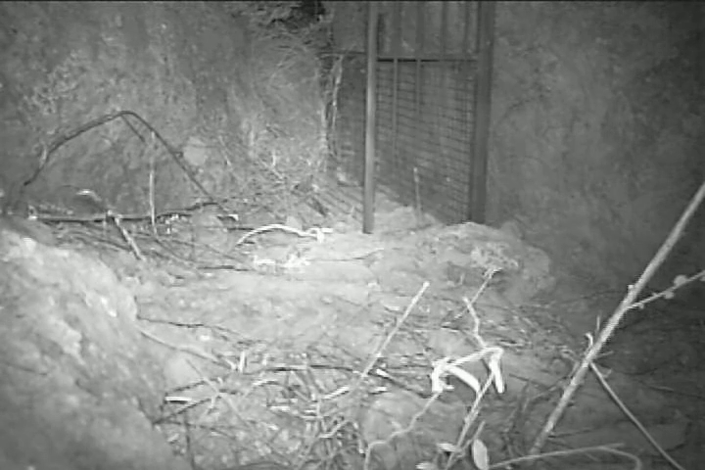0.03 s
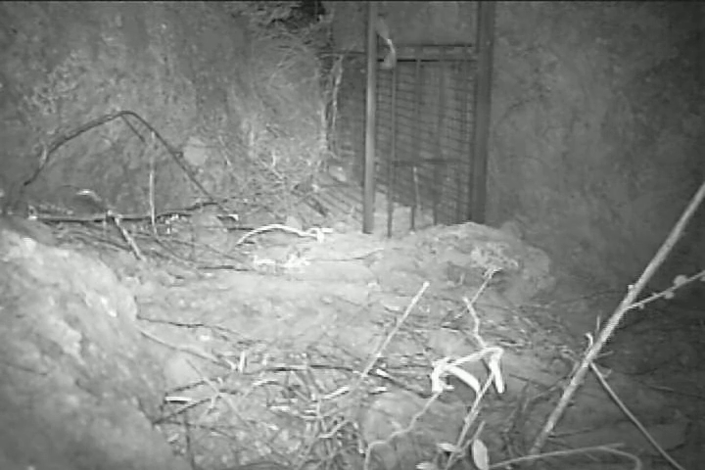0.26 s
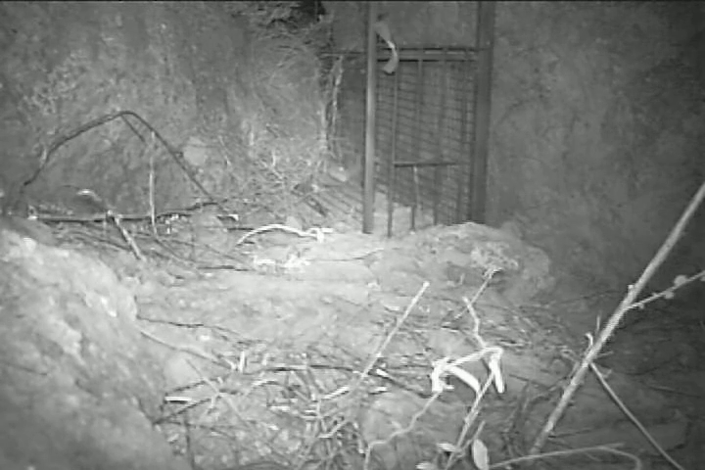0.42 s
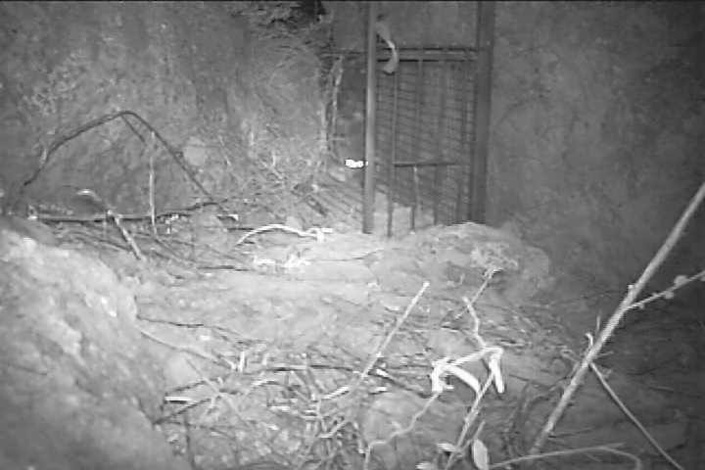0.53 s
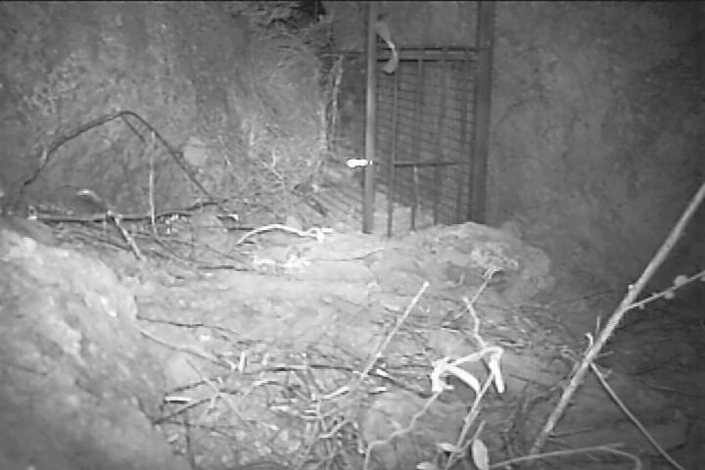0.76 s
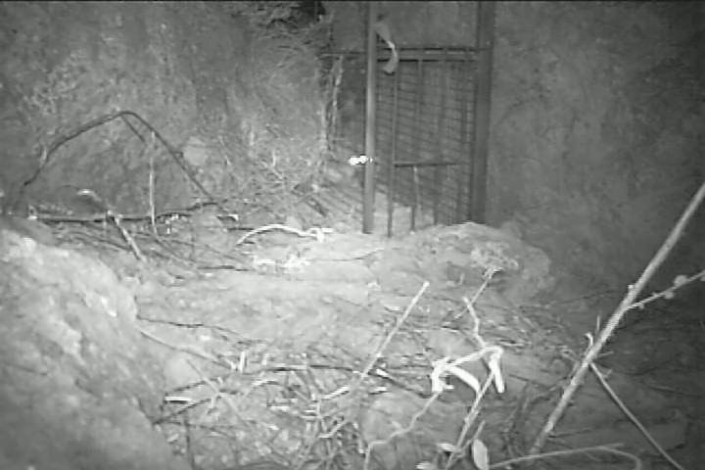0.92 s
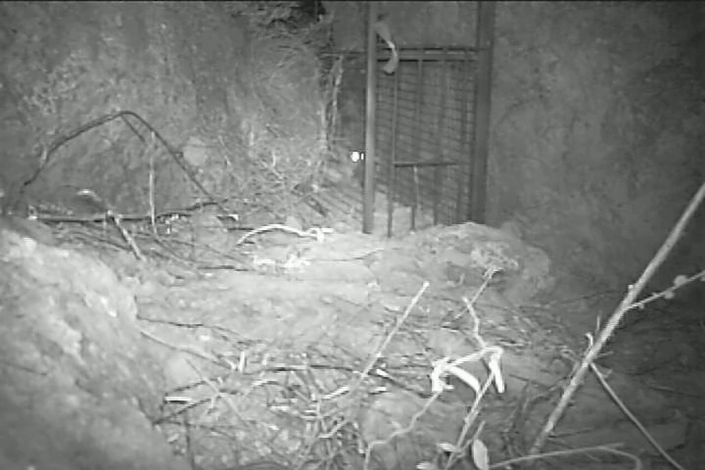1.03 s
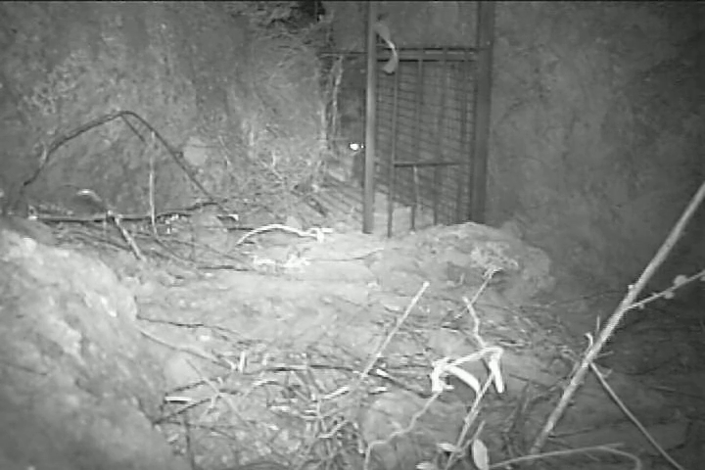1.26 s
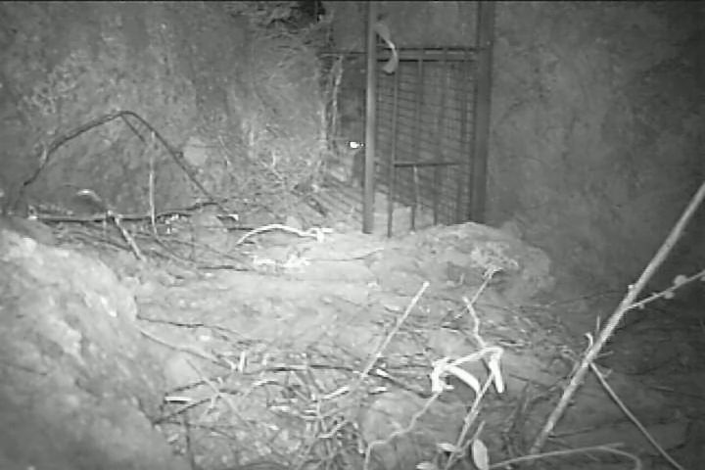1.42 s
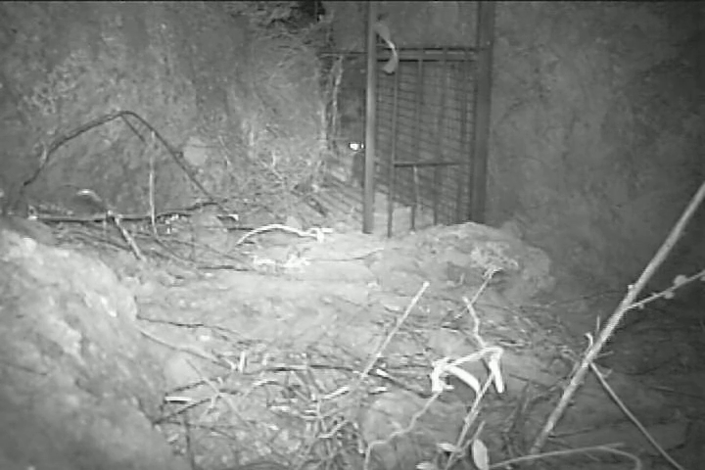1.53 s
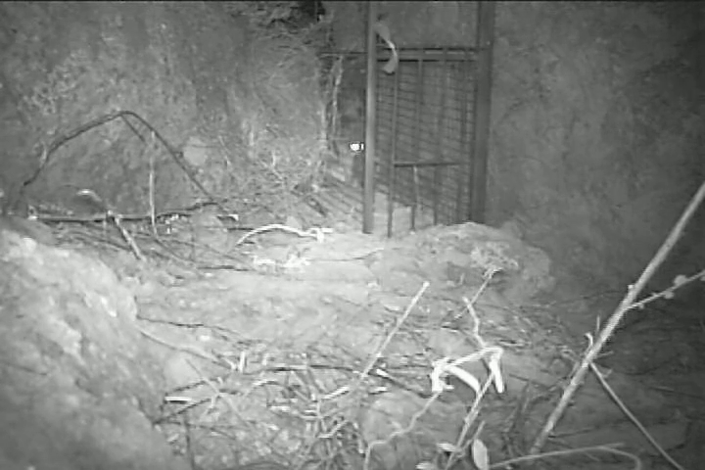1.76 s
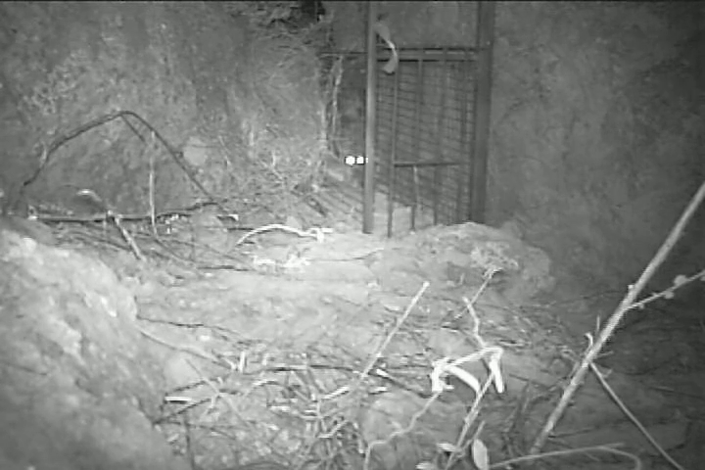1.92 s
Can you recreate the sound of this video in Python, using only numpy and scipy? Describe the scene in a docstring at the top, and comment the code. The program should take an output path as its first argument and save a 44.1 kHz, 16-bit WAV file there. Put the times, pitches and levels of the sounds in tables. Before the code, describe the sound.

Steel cage door drops with a quick scrape and loud clanging bang, then chatters and rings out

```python
"""Over air rumble, hiss and a camera's thin whine, a cage trap's steel mesh door scrapes down its guides.
It clips the frame, slams onto the sill and chatters to rest with faint squeaks and pings of a steel catch.
Scrape and mesh are coloured noise; bars, catch, frame and ground thud are dying sines.
Squeaks are gliding sines. The mesh and a few frame modes ring on after the slam."""
import sys
import numpy as np
from scipy import signal
from scipy.fft import rfft, irfft, next_fast_len
from scipy.io import wavfile
from scipy.ndimage import uniform_filter1d, map_coordinates

SR = 44100
rng = np.random.default_rng(int(sys.argv[2]) if len(sys.argv) > 2 else 0)


def generate_wav(sig):
    """Save sig (samples, or channels by samples) to the path in sys.argv[1] as 16-bit PCM at SR."""
    pcm = np.round(np.clip(np.atleast_2d(sig).T, -1, 1) * 32767).astype(np.int16)
    wavfile.write(sys.argv[1], SR, pcm)


N = 88200


def amp(db):
    """Decibels to gain."""
    return 10 ** (np.asarray(db) / 20)


def unit(x):
    """Scale to rms 1."""
    return x / np.sqrt(np.mean(x ** 2) + 1e-20)


def clock():
    """Time of every sample in seconds."""
    return np.arange(N) / SR


def along(points, hz):
    """Interpolate (Hz, value) points on a log-frequency axis."""
    point_hz, values = np.transpose(points)
    return np.interp(np.log(hz + 1), np.log(point_hz + 1), values)


def level(rows):
    """Gain per sample from (s, dB) points."""
    return amp(np.interp(clock(), *np.transpose(rows)))


def shape(x, gain):
    """Filter x by a gain per FFT bin."""
    return irfft(rfft(x) * gain, N)


def noise(spectrum):
    """Gaussian noise coloured by (Hz, dB) points, rms 1."""
    hz = np.fft.rfftfreq(N, 1 / SR)
    return unit(shape(rng.standard_normal(N), amp(along(spectrum, hz))))


def wobble(rate_hz):
    """Smooth random curve with rate_hz knots a second."""
    return map_coordinates(rng.standard_normal(N // 10), [clock() * rate_hz], mode="mirror")


def start_at(x, start_s, rise_s):
    """Delay x to start_s and let it swell in over about rise_s."""
    swell = 1 - np.exp(-(clock() / rise_s) ** 2)
    return np.pad(x * swell, (max(round(start_s * SR), 0), 0))[:N]


def ring(modes):
    """Sum of exponentially dying sines from (Hz, dB, t60 s) rows."""
    t = clock()
    return sum(amp(db - 60 * t / t60_s) * np.sin(2 * np.pi * hz * t) for hz, db, t60_s in modes)


# Colour of the hiss. Each row: frequency in Hz, relative density in dB per Hz.
HISS_COLOUR = [(20, -5.5), (100, 1), (250, -8), (500, -14), (1000, -20), (2000, -22.5), (2700, -25.5),
               (4000, -26), (8000, -28), (15800, -30.5)]
# Colour of the air rumble. Each row: frequency in Hz, relative density in dB per Hz.
RUMBLE_COLOUR = [(8, -2), (25, 7.5), (45, -5), (90, -14), (200, -35), (600, -58.5)]
# Drift of the rumble. Each row: time in seconds, level in dB.
RUMBLE_LEVEL = [(0, -61.5), (.6, -60), (.76, -52), (.98, -62.5), (1.13, -56.5), (1.47, -56), (1.62, -63.5),
                (2, -65.5)]
HISS_DB = -68.5
WHINE_HZ, WHINE_DB = 15625, -80.5


def background():
    """Low noise drifting in level, steady broadband hiss and the camera's line whine, a pure sine."""
    rumble = level(RUMBLE_LEVEL) * noise(RUMBLE_COLOUR)
    hiss = amp(HISS_DB) * noise(HISS_COLOUR)
    whine = amp(WHINE_DB) * unit(np.sin(2 * np.pi * WHINE_HZ * clock()))
    return rumble + hiss + whine


# Rubbing in the guides. Each row: time in seconds, level in dB.
SLIDE_LEVEL = [(0, -47), (.03, -43), (.08, -43.5), (.115, -45.5), (.14, -47), (.168, -58), (.2, -52),
               (.22, -59), (.25, -87.5)]
# Colour of the rubbing. Each row: frequency in Hz, relative density in dB per Hz.
RUB_COLOUR = [(30, -33.5), (90, -11.5), (200, -36), (900, -42), (1200, -29.5), (2150, -17.5), (2750, -0.5),
              (3200, -13.5), (4300, -20.5), (5300, -21), (6400, -33), (7800, -24), (9000, -29),
              (11300, -22.5), (13300, -39), (15800, -45)]
TICKS_PER_S, TICK_SCATTER_DB, TICK_T60_S = 500, 2.5, .06


def slide():
    """The falling door scrapes in its guides: random, uneven ticks whose decaying powers overlap."""
    struck = rng.random(N) < TICKS_PER_S / SR
    ticks = struck * amp(TICK_SCATTER_DB * rng.standard_normal(N))
    decay = amp(-60 * clock() / TICK_T60_S)
    power = shape(ticks ** 2, rfft(decay ** 2))
    envelope = np.sqrt(np.abs(power))
    return level(SLIDE_LEVEL) * unit(envelope * noise(RUB_COLOUR))


# Squeaks of steel on steel. Each row: start in seconds, length in seconds, from Hz, to Hz, level in dB.
SQUEAK_GLIDES = [(0, .018, 8900, 9200, -55.5), (0.186, 0.018, 8000, 8064, -51),
                 (0.41, .03, 9400, 8000, -55), (.464, .045, 6900, 9420, -54)]
WAVER_HZ = 160  # rms


def squeaks():
    """The door rubs and settles: short sine glides with a randomly wavering pitch."""
    out = np.zeros(N)
    for start_s, length_s, from_hz, to_hz, db in SQUEAK_GLIDES:
        progress = np.clip((clock() - start_s) / length_s, 0, 1)
        waver = unit(uniform_filter1d(rng.standard_normal(N), size=30))
        hz = from_hz + (to_hz - from_hz) * progress + WAVER_HZ * waver
        envelope = np.sqrt(np.abs(np.sin(np.pi * progress)))
        out += amp(db) * envelope * np.sin(2 * np.pi * np.cumsum(hz) / SR)
    return out


# The door's contacts. Each row: start in seconds, short clank in dB, lasting ring in dB,
# clang of the bars in dB, treble tilt in dB per octave above 2800 Hz, rise in seconds.
DOOR_CONTACTS = [(0.077, -45.5, -57.5, -59, 8.5, .003), (.177, -48, -53, -51, 6, .003),
                 (0.2117, -30, -39, -34, 2, 0.0003), (0.2354, -10.5, -24.5, -13, -2.5, .004),
                 (0.247, -20.5, -30, -69, 8.5, 0.01), (.301, -19.5, -38, -37, 4, .0008),
                 (.337, -22.5, -31.5, -36, -1.5, 0.0023), (.363, -29.5, -42, -26.5, 3, 0.0018),
                 (0.396, -49, -56, -34.5, -11.5, 0.0015), (.444, -41.5, -53, -42, -2.5, 0.00384),
                 (.479, -57, -46.5, -33.5, 0, 0.0013), (0.51, -52, -47, -39.5, -7.5, 0.0018),
                 (0.635, -49, -60, -44.5, 0, 0.0062), (0.859, -70, -64.5, -65.5, -6, 0.005),
                 (1.12, -76, -75.5, -68, 3, 0.026)]
# Colour of the struck wire mesh. Each row: frequency in Hz, relative density in dB per Hz.
MESH_COLOUR = [(30, -43), (120, -32.5), (400, -36), (700, -30.5), (1400, -27), (2150, -14), (2680, -2),
               (3150, -11.5), (3600, -14.5), (4150, -22), (5000, -14.5), (6200, -30.5), (7500, -23.5),
               (9000, -30.5), (10000, -21), (11000, -22.5), (12200, -25), (13300, -41.5), (15800, -45)]
# Decay of the mesh's lasting ring. Each row: frequency in Hz, t60 in seconds.
MESH_DECAY = [(100, .7), (600, 0.64), (1500, .92), (2800, 0.86), (5000, .62), (7500, 0.45), (11000, .46),
              (15000, 0.5)]
MODE_SPREAD_DB = 2.5  # how far single modes stand out, rms
CLANK_T60_S = .125
CLANK_BODY_DB = 2  # clank's extra weight an octave or more below 2800 Hz
BUZZ_DB, BUZZ_PER_S = 4.5, 240  # loose wires buzz against each other during a clank


def mesh():
    """Each contact excites the same dense mesh modes: a short buzzing clank and a ring with t60 by frequency."""
    out = np.zeros(N)
    freq = np.fft.rfftfreq(N, 1 / SR)
    octaves = np.log2(np.maximum(freq, 100) / 2800)
    mode_curve = unit(uniform_filter1d(rng.standard_normal(len(freq)), size=50))
    modes = amp(MODE_SPREAD_DB * mode_curve)
    body = amp(CLANK_BODY_DB * np.clip(-octaves, 0, 1))
    for start_s, clank_db, ring_db, _, tilt_db, rise_s in DOOR_CONTACTS:
        colour = modes * amp(tilt_db * np.maximum(octaves, 0))
        buzz = amp(BUZZ_DB * wobble(BUZZ_PER_S))
        clank = unit(buzz * shape(noise(MESH_COLOUR), colour * body))
        clank = clank * amp(-60 * clock() / CLANK_T60_S)
        steady = unit(shape(noise(MESH_COLOUR), colour))
        hz, t, bins = signal.stft(steady, SR, nperseg=512)
        decay = amp(-60 * t / along(MESH_DECAY, hz)[:, None])
        tail = signal.istft(bins * decay, SR, nperseg=512)[1][:N]
        out += start_at(amp(clank_db) * clank + amp(ring_db) * tail, start_s, rise_s)
    return out


# The door's bars. Each row: frequency in Hz, dB relative to the contact's clang, t60 in seconds.
BAR_MODES = [(1856, -24, 0.22), (2026, -21, 0.45), (2248, -14.5, .2), (2441, -14, 0.57), (2609, 1, 0.19),
             (2728, 8.5, 0.069), (2877, -16, .15), (3074, -16.5, 0.095), (3490, -12, 0.21),
             (3664, -12.5, 0.13)]
BAR_SCATTER_DB = -1.5  # random spread of each mode from blow to blow; the sign only mirrors the draws


def bars():
    """Every contact clangs the door's bars, whose close modes beat against each other."""
    modes = np.array([ring([mode]) for mode in BAR_MODES])
    out = np.zeros(N)
    for start_s, _, _, clang_db, _, rise_s in DOOR_CONTACTS:
        gains = amp(clang_db + BAR_SCATTER_DB * rng.standard_normal(len(BAR_MODES)))
        out += start_at(gains @ modes, start_s, rise_s)
    return out


# The small steel catch. Each row: frequency in Hz, dB relative to the hit, t60 in seconds.
CATCH_MODES = [(4800, -40, .3), (8150, -51, .55), (9960, -46, .22), (10450, -43, .22), (11040, -28, .28),
               (11020, -32, .2), (13248, -51, .25), (14607, -43.5, .16)]
# Jolts of the catch. Each row: start in seconds, gain in dB.
CATCH_JOLTS = [(.085, -29.5), (.125, -22.5), (.214, -4.5), (.246, -6.5), (.302, 2.5), (.335, -14.5)]
CATCH_RISE_S = .008


def catch():
    """The catch's high modes ring thinly at each jolt, most on the rebound."""
    ping = ring(CATCH_MODES)
    return sum(amp(db) * start_at(ping, start_s, CATCH_RISE_S) for start_s, db in CATCH_JOLTS)


# Long-ringing cage frame. Each row: frequency in Hz, level in dB, t60 in seconds.
FRAME_MODES = [(608, -64, 2), (669, -65, 2.9), (973.6, -65, 2.3), (1078, -46, 0.68), (1566.4, -53.5, 1.36),
               (2284, -39.5, 1.3), (2641, -48.5, 1.1), (2712, -39.5, 1.05), (3280, -56.5, 1.192),
               (3828, -50, .8), (5510, -40.5, 0.99)]
SLAM_S, SLAM_RISE_S = .2367, .0035
THUD_S, THUD_HZ, THUD_DB, THUD_T60_S, THUD_RISE_S = .2395, 84, -25, .13, .0058


def slam():
    """The door hits the sill: the frame's modes ring and the ground thuds as one low dying sine."""
    frame = start_at(ring(FRAME_MODES), SLAM_S, SLAM_RISE_S)
    thud = start_at(ring([(THUD_HZ, THUD_DB, THUD_T60_S)]), THUD_S, THUD_RISE_S)
    return frame - thud  # thud in opposite polarity


def scene():
    """Sum of all sources at one microphone."""
    return (mesh() + bars() + slide() + slam() + catch() + squeaks() + background())[None]


CEILING, TOP_HZ = .74, 15800


def record(dry):
    """The camera rounds off the loudest peaks, then cuts everything above its band limit."""
    padded = next_fast_len(N + SR // 2)
    rounded = dry / (1 + np.abs(dry / CEILING) ** 6) ** (1 / 6)
    passed = np.fft.rfftfreq(padded, 1 / SR) < TOP_HZ
    return irfft(rfft(rounded, padded) * passed, padded)[..., :N]


dry = scene()
out = record(dry)
generate_wav(out)
```